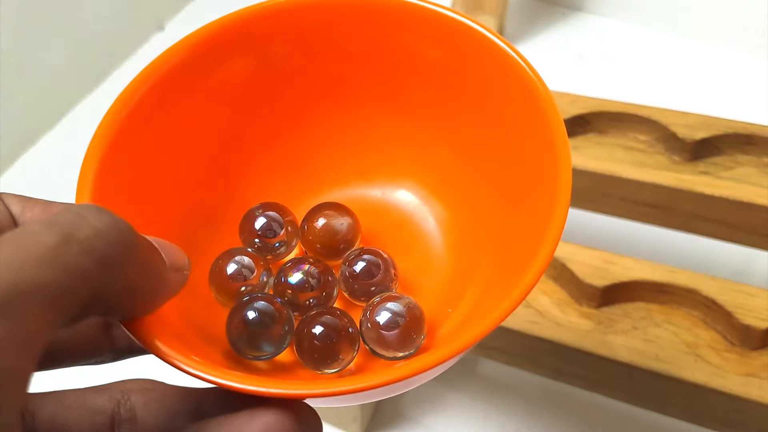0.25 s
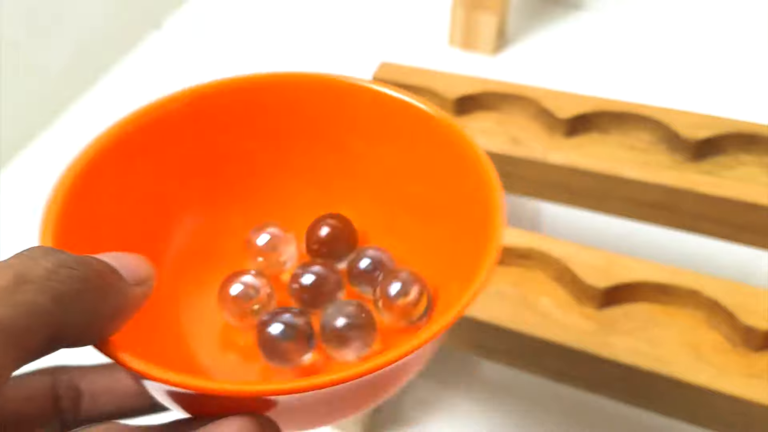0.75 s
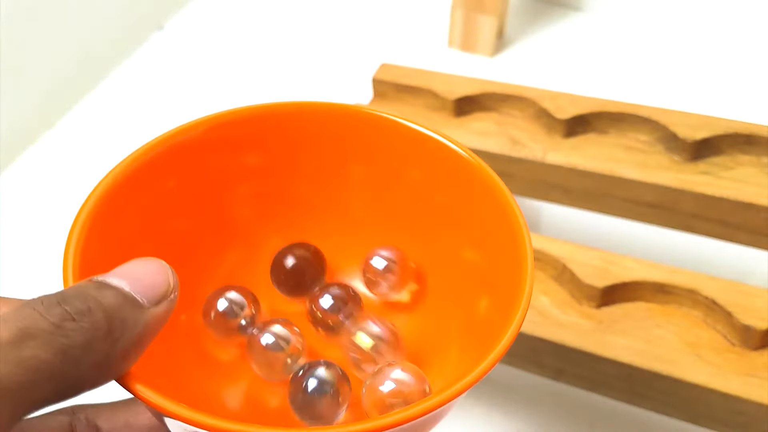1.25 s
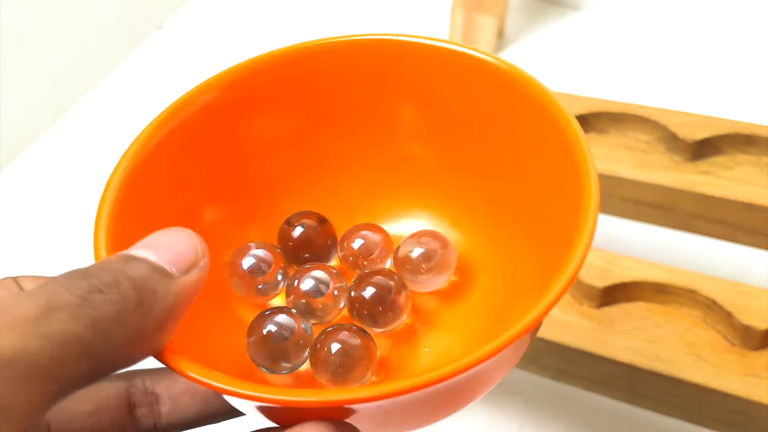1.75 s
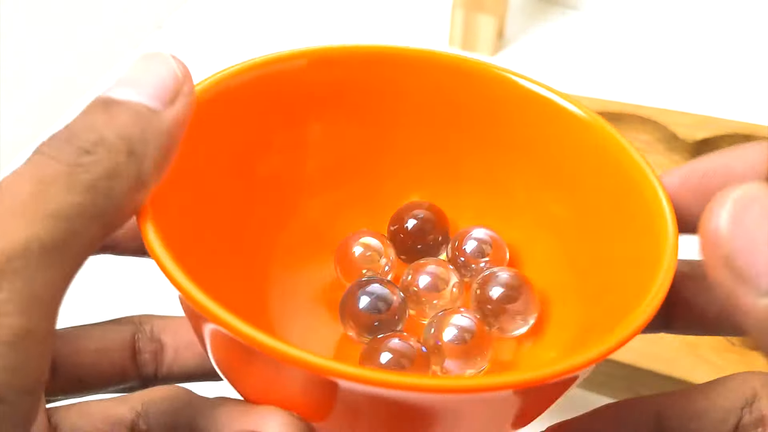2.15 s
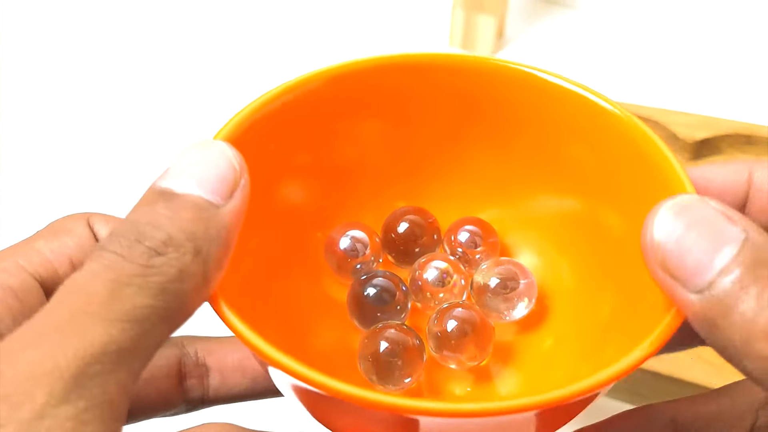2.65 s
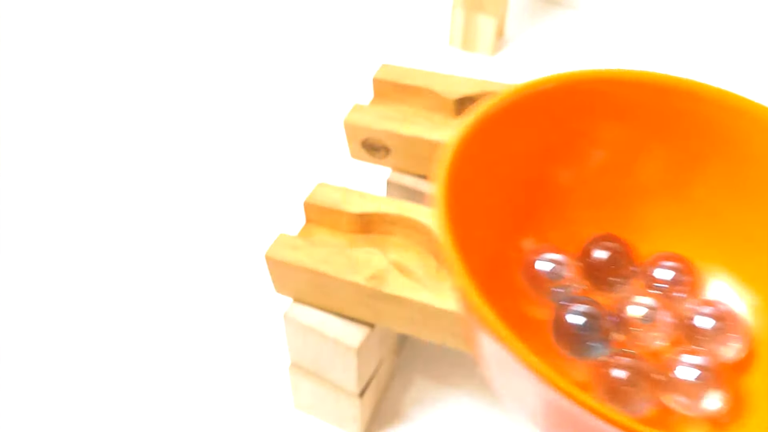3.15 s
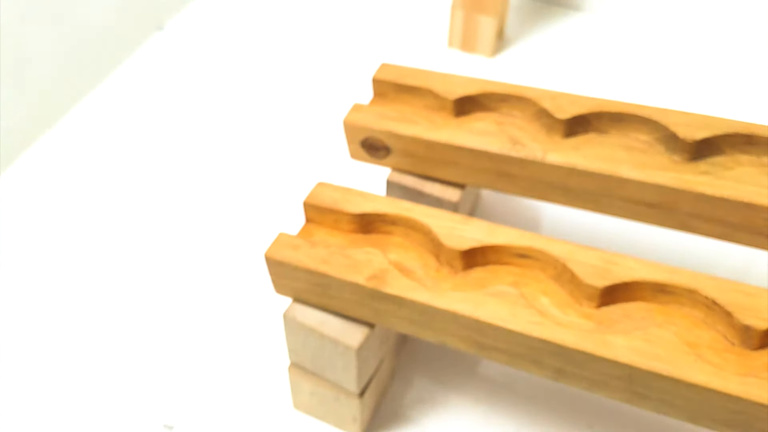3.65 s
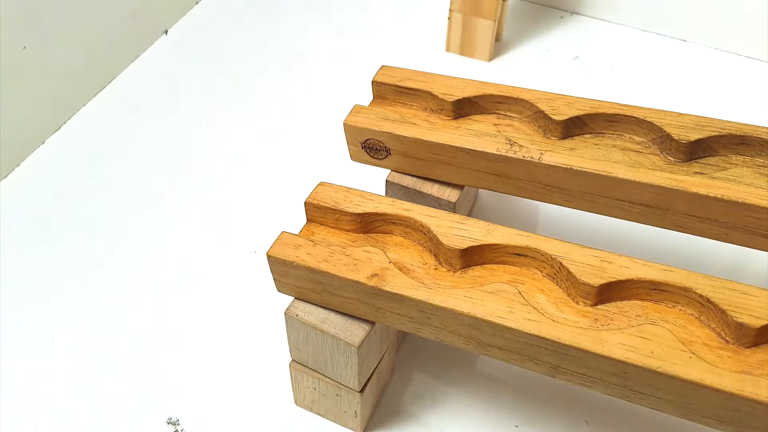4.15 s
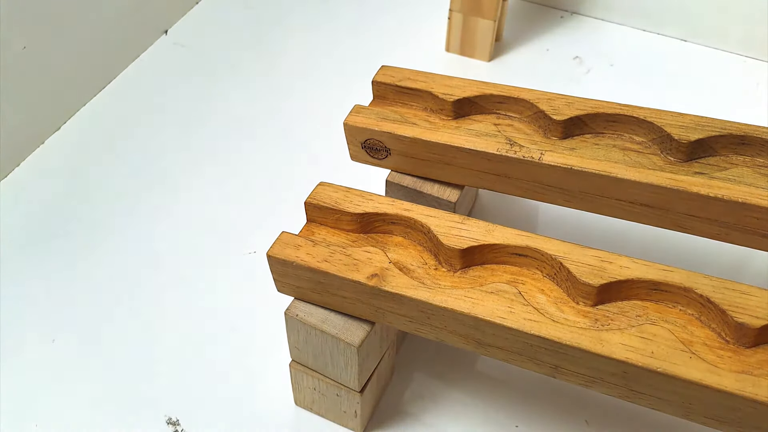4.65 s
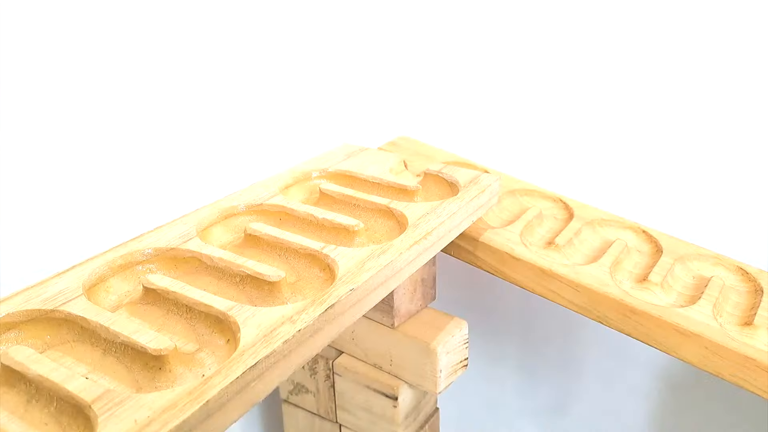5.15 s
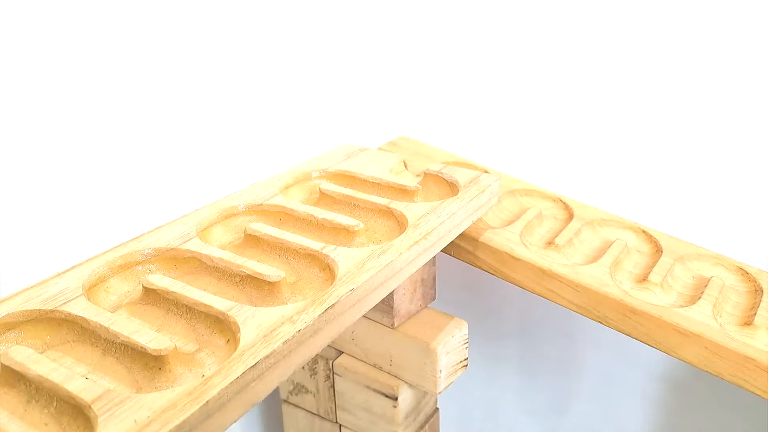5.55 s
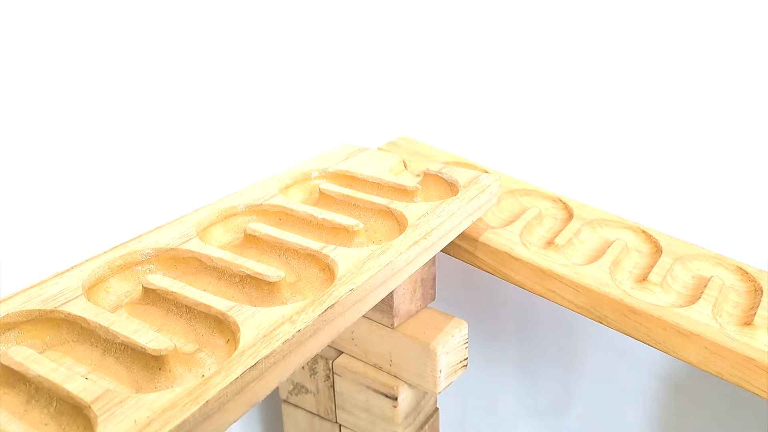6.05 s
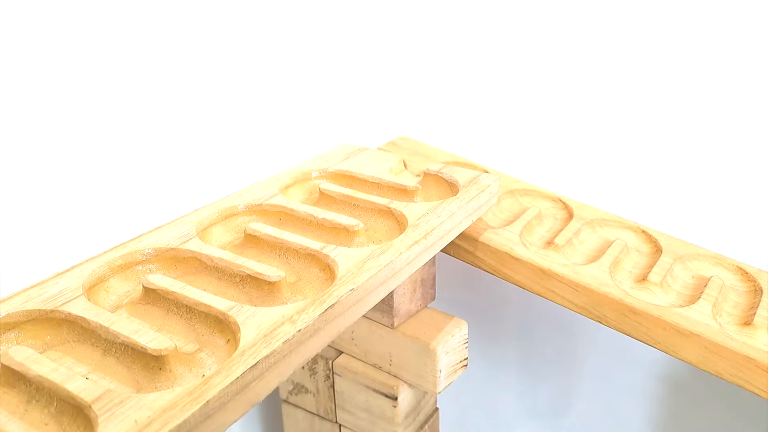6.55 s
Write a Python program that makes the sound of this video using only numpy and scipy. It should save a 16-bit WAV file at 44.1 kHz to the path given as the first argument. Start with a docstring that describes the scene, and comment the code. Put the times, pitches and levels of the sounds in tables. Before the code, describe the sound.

Glass marbles rattle close by in a hand-held plastic bowl, shaken twice so they clink brightly and knock its sides. They settle into light ticks, then the bowl is set down slightly to the right with a hollow boom and another clatter. After a lull, one marble drops onto a wooden track, bounces and starts rolling. The room is small and hard, with faint traffic and later an idling engine outside.

```python
"""Glass marbles rattle in a hand-held plastic bowl in a small hard room, traffic rumbling outside.
Shaken twice, they tick against each other and knock the wall, base and rim into ringing.
The bowl is carried off to the right and set down with a boom. A tick marks the cut to a second scene:
an engine idles beyond the wall, something chirrs far off, and a marble drops onto a wooden track,
bounces and rolls away over the grain."""
import sys
import numpy as np
from scipy import signal
from scipy.fft import rfft, irfft
from scipy.io import wavfile
from scipy.ndimage import uniform_filter1d

SR = 44100
rng = np.random.default_rng(int(sys.argv[2]) if len(sys.argv) > 2 else 0)


def store_wav(level_fs):
    """Save 16-bit WAV to argv[1]."""
    pcm = np.round(np.clip(np.atleast_2d(level_fs), -1, 1) * 32767)
    wavfile.write(sys.argv[1], SR, pcm.T.astype(np.int16))


N = 299880

# jolts that set the marbles jostling: start/s, rise/s, hold/s, wall level/dB, rim re wall/dB,
# glass re wall/dB
JOLTS = [(0, 0.00067, 0.005, -41, -2.5, -1.5), (0.092, 0.0018, 0.0033, -34.5, -11, -1),
         (0.523, 0.053, 0.044, -57.5, -36, -29), (0.608, 0.036, 0.058, -32, -17.5, -9),
         (0.729, 0.0026, 0.065, -29, 6, 8), (0.832, 0.0018, 0.14, -28.5, 8, 7.5),
         (1.155, 0.003, 0.054, -29.5, 8.5, 10.5), (1.227, 0.035, .26, -30.5, 7, 6),
         (1.533, 0.016, 0.046, -42.5, -9, 5), (2.063, 0.0054, 0.07, -55.5, -22, -13),
         (2.212, 0.0021, 0.03, -44, -23.5, -5), (2.46, 0.0016, 0.085, -73.5, -43, -13),
         (2.61, .002, 0.035, -67, -29.5, -9), (3.502, .002, .015, -61, -46.5, -7),
         (3.564, 0.0021, 0.091, -63, -59, -2.5), (3.867, 0.0024, 0.034, -70.5, -26, 6),
         (4.124, .002, 0.045, -53, -39.5, -5), (4.318, 0.0025, 0.092, -44, -16.5, -1),
         (4.409, 0.0015, 0.022, -23.5, -16, -2), (4.589, 0.0028, 0.028, -25.5, -20.5, 9.5),
         (4.643, 0.0055, 0.045, -32.5, -11.5, -3), (4.703, .003, 0.06, -37.5, -31, -2),
         (4.834, 0.014, .01, -43, -30, -15), (4.851, .002, 0.015, -35, -31, -5.5),
         (4.945, 0.0012, 0.0092, -45, -34, -2)]
# single clinks that stand out of the rattle: t/s, glass level/dB, wall re glass/dB
CLINKS = [(0.0186, -41.5, 4), (0.0978, -19, -0.5), (0.669, -9.5, -25), (0.7344, -3, -12.5),
          (0.7695, -14, -37), (0.835, -5, -12), (0.8631, -4, -12), (0.886, -8, -2), (0.9073, -9, -16),
          (0.9235, -21, -28), (1.098, -31.5, -36.5), (1.155, -6, -9), (1.1594, -6, -14), (1.1764, 0, -37),
          (1.1893, -13, -8), (1.2086, -15, -10), (1.264, -15.5, -3), (1.295, -7, -11), (1.3311, -16, -30),
          (1.351, -8.5, -6.5), (1.3874, -16, -17), (1.3972, -11.5, -23), (1.4255, -12.5, -11),
          (1.5915, -23, 1.5), (1.711, -44, -0.5), (1.7232, -42, -16), (1.858, -41.5, -4),
          (1.8916, -63.5, 1), (1.961, -44, -1), (1.988, -62, 4), (2.071, -51, 7.5), (2.1201, -49, 5),
          (2.1486, -36.5, 1), (2.216, -45, -12), (2.2925, -31, 1), (2.465, -55, 8.5), (2.5102, -45, -15),
          (2.6112, -58, 4.5), (2.9573, -46.5, -8), (3.1066, -44.5, -5), (3.232, -43.5, -2),
          (3.508, -32.5, -5), (3.5658, -20, -17.5), (3.5866, -43, 9), (3.7197, -46.5, -23.5),
          (3.8719, -40, 2), (4.0348, -41, -8), (4.1309, -35, -2), (4.1729, -52, -5), (4.234, -42.5, 2.5),
          (4.3265, -24.5, -13), (4.4161, -13, -0.5), (4.594, -19, 8), (4.6051, -2, -16), (4.6546, -9, -6),
          (4.7117, -10, -5.5), (4.8641, -12.5, -23), (4.9539, -22.5, -5)]
# modes of the bowl's three parts and of glass on glass: f/Hz, width/Hz, level/dB
WALL_MODES = [(1170, 150, -17.5), (1216, 250, -1), (1260, 150, 3.5), (1504, 150, 4.5), (1689, 47, -3),
              (1890, 590, -7), (2836, 590, -5.5)]
BASE_MODES = [(94, 30, -13.5), (210, 60, -21), (398, 170, -20), (533, 100, -1.5), (679, 83, 4.5),
              (771.5, 32, 0.5), (824, 170, 6), (5020, 230, -8.5)]
RIM_MODES = [(3864, 120, -2.5), (3973, 79, 2), (4041, 50, 1), (4116, 60, -2), (4460, 80, -9.5)]
GLASS_MODES = [(2840, 170, -10.5), (4570, 370, 1), (5400, 2400, -2), (6600, 170, 2.5), (7040, 150, 4.5),
               (8130, 480, 3.5), (9400, 680, -2.5), (10220, 120, 0), (10965, 450, -3), (12100, 1000, -4.5),
               (12700, 210, -1), (13300, 1800, -11)]
# pan of the marbles, left minus right: t/s, below 2 kHz/dB, above 2 kHz/dB
PAN = [(2.9, 3, 0.5), (3.4, -4.5, -4.5), (5.2, 1, -3.5), (5.21, 0, 0)]
# how late they reach the left microphone: t/s, lag/ms
LEFT_LAG = [(3, -.17), (3.5, .45), (5.2, .45), (5.21, .33)]
# decay of the room: f/Hz, T60/s
ROOM_T60 = [(100, 0.36), (1000, 0.21), (5000, 0.21), (14000, 0.13)]
# traffic swells in the first scene: t/s, rumble level/dB, murmur level/dB
TRAFFIC_SWELLS = [(0, -55, -61), (.6, -48.5, -64.5), (1.2, -61.5, -64.5), (1.8, -67, -81.5),
                  (2.5, -66.5, -76), (3.1, -57, -66), (3.95, -50, -62.5), (4.35, -55.5, -66.5),
                  (4.7, -44, -60), (5.2, -66.5, -70)]
# tone colour of the three traffic layers and the microphone hiss: f/Hz, relative level/dB
RUMBLE_SPECTRUM = [(25, -21), (49, 1.5), (70, -15.5), (97, 9.5), (118, -1.5), (142, 2), (170, -21),
                   (250, -39)]
MURMUR_SPECTRUM = [(120, -35.5), (180, -7), (300, 1), (380, -9), (480, -11.5), (700, -39)]
WASH_SPECTRUM = [(300, -29.5), (500, -1), (750, 0), (1100, -9), (3500, -15.5), (4500, -25.5), (7500, -26),
                 (10500, -33), (12500, -50)]
HISS_SPECTRUM = [(500, -20), (900, 0), (5000, -4), (7500, -8), (10800, -10), (12500, -20), (13200, -70)]
# exhaust harmonics: multiple of the firing rate, relative level/dB
EXHAUST_HARMONICS = [(3, -10), (4, -12), (5, -11), (6, -1), (7, 0), (8, -4), (9, -12), (10, -19), (11, -22)]
# bands of the distant chirr: f/Hz, width/Hz, relative level/dB
CHIRR_BANDS = [(2640, 13, -2), (3190, 84, -4.5), (3412, 41, -1.5), (3720, 450, -11.5), (4240, 59, -5.5),
               (4674, 310, -11.5), (6050, 40, -3.5), (8060, 51, -18.5), (10300, 58, -11)]
# modes of the wooden track: f/Hz, width/Hz, level/dB
TRACK_MODES = [(105.6, 23, -9), (196, 114, -12.5), (348, 8.4, 3), (421, 31, -6.5), (600, 165, -4),
               (988, 39, 1.5), (1286, 140, -0.5), (1547, 124, 0), (1810, 110, 1), (2130, 85, -7.5),
               (2560, 64, -2.5), (3300, 390, -11.5), (4800, 410, -29.5), (7600, 2100, -38)]
# the marble's roll and its bounces on the track: t/s, level/dB, brightness/0-1
ROLL = [(6.479, -27, 0.98), (6.49, -13.5, 1), (6.52, -33.5, 0.2), (6.564, -31, 0.7), (6.6, -43, 0),
        (6.66, -46, 0.1), (6.72, -44.5, 0), (6.8, -38.5, 0)]
BOUNCES = [(6.486, -9, 1), (6.495, -13, 0.78), (6.5, -14.5, 0), (6.519, -20.5, 0.8), (6.536, -7.5, 1),
           (6.543, -11.5, 1), (6.558, -12.5, 0.33), (6.567, -21, 0.9), (6.682, -23, 1), (6.748, -24, 0.3)]

SAG_DB_PER_S, SETTLE_DB_PER_S = 26.5, 327.5  # a jolt sags from its peak and dies fast after its hold
SOFT_BELOW_DB = -16.5  # lighter clinks sound duller
SET_DOWN_S, KNOCK_S, CUT_S = 4.405, 4.594, 5.2105
BASE_HELD_DB, BASE_DOWN_DB, KNOCK_DB, KNOCK_FADE_S = -13, 3.5, 5, 0.017
ROOM_DB, CUT_TICK_DB = -3.5, -37
IDLE_HZ, IDLE_DB = 12, -40.5  # firing rate and level of the engine
CHIRR_REST_DB, CHIRR_SWELL_DB, CHIRR_SWELL_S, CHIRR_SWELL_WIDTH_S = -71, 4.5, 5.88, 0.24


def undb(db):
    """Decibels to gain."""
    return 10 ** (np.asarray(db) / 20)


def curve(table, at, column=1):
    """One column of a breakpoint table, interpolated along the first."""
    rows = np.array(table, float)
    return np.interp(at, rows[:, 0], rows[:, column])


def noise_bed(spectrum, mono_below_hz):
    """Shaped stereo noise of rms 1, narrowing to mono in the bass."""
    hz = np.arange(N // 2 + 1) * SR / N + 1
    gain = undb(curve([(np.log(f), db) for f, db in spectrum], np.log(hz)))
    gain *= np.minimum(spectrum[-1][0] / hz, 1) ** 4
    mid, side = rfft(rng.standard_normal((2, N))) * gain
    side = side * hz / np.hypot(hz, mono_below_hz)
    out = irfft(np.array([mid + side, mid - side]), N)
    return out / out.std()


def wander(rate_hz):
    """Smooth random modulation with a spread of 1."""
    hold = int(SR / rate_hz)
    steps = np.repeat(rng.standard_normal(N // hold + 1), hold)
    smooth = uniform_filter1d(uniform_filter1d(steps, hold), hold)[:N]
    return smooth / smooth.std()


def contacts(start_s, end_s, rate, spread_db):
    """Times and levels of random contacts, many soft and few hard, with a mean power of 0 dB."""
    when, strength = rng.random((int(rate * (end_s - start_s)), 2)).T
    db = -spread_db * np.log(1 - .97 * strength)
    return start_s + when * (end_s - start_s), db - 10 * np.log10(np.mean(undb(db) ** 2))


def ring(modes, hits, swarm, rate, tilt_db_per_octave, drift_db, wide_hz=920):
    """A body rung by hits (t/s, peak/dB) and a swarm (t/s, rms/dB) of `rate` contacts a second."""
    hz, width, db = np.transpose(modes)
    radii = np.exp(-np.pi * width / SR)
    gains = undb(db) * (1 - radii)
    peak = np.sqrt(np.sum(gains ** 2))
    rms = np.sqrt(rate / SR * np.sum(gains ** 2 / (1 - radii ** 2)) / 2)
    times = np.concatenate([hits[0], swarm[0]])
    strength = np.concatenate([undb(hits[1]) / peak, undb(swarm[1]) / rms])
    half_lag = curve(LEFT_LAG, times) * SR / 2000
    start = max(int(times.min() * SR) - 100, 0)
    end = min(int(times.max() * SR) + SR // 4, N)
    out = np.zeros((2, N))
    for f, radius, gain in zip(hz, radii, gains):
        # each blow lands elsewhere, so it finds the mode with another sign and strength
        sign, luck, lobe = rng.standard_normal((len(times), 3)).T
        colour_db = 4 * luck + tilt_db_per_octave * np.log2(f / 1000)
        # the mode also comes and goes over a few blows
        drift = undb(drift_db * np.interp(times * 14, np.arange(100), rng.standard_normal(100)))
        force = drift * gain * strength * np.sign(sign) * undb(colour_db)
        # higher modes radiate in lobes, reaching the two microphones in different phases
        phase = np.exp(1j * lobe * min(f / wide_hz, 1.3))
        pan_db = curve(PAN, times, column=2 if f > 2000 else 1) / 2
        pole = radius * np.exp(2j * np.pi * f / SR)
        for channel, side in enumerate((1, -1)):
            # the lowest modes shake the whole table and reach both microphones at once
            at = np.clip(times * SR + side * half_lag * (f > 500), 0, N - 1).astype(int)
            blows = np.zeros(end - start, complex)
            np.add.at(blows, at - start, force * undb(side * pan_db) * (phase if channel else 1))
            out[channel, start:end] += signal.lfilter([1], [1, -pole], blows).imag
    # a small body radiates little below its first mode; contact is too soft for much above the last
    band = signal.butter(2, [hz.min() * .7, min(hz.max() * 1.4, 19000)], "band", fs=SR, output="sos")
    return signal.sosfilt(band, out)


def jostle(t):
    """Wall, rim and glass envelopes in dB: each jolt rises, sags and settles, and their powers add."""
    start, rise, hold, wall_db, rim_db, glass_db = np.transpose(JOLTS)[:, :, None]
    age = t - start - rise
    db = wall_db + 40 * np.minimum(age / rise, 0)
    db -= SAG_DB_PER_S * np.maximum(age, 0) + SETTLE_DB_PER_S * np.maximum(age - hold, 0)
    return [10 * np.log10(np.sum(undb(db + offset) ** 2, axis=0) + 1e-14)
            for offset in (0, rim_db, glass_db)]


def base_boom(t):
    """Gain of the base in dB: damped by the hand, booming on the table, most at the hard knock."""
    knock_db = KNOCK_DB * np.exp(-np.maximum(t - KNOCK_S, 0) / KNOCK_FADE_S) * (t > KNOCK_S - .002)
    return np.where(t > SET_DOWN_S, BASE_DOWN_DB + knock_db, BASE_HELD_DB)


def bowl_rattle():
    """Marbles knock the wall, base and rim of the bowl and tick against each other."""
    clink_s, clink_db, wall_db = np.transpose(CLINKS)
    # every clink chatters on in three softer rebounds
    rebound_s = np.cumsum(.006 * rng.exponential(size=(len(clink_s), 3)), axis=1)
    hit_s = np.column_stack([clink_s, clink_s[:, None] + rebound_s]).ravel()
    rebound_db = np.column_stack([np.zeros_like(clink_s), -8 - 250 * rebound_s])
    softness = np.clip(SOFT_BELOW_DB - clink_db, 0, 40)
    # the rim's share of a clink follows the jostling around it, and is less for a light one
    _, rim_jostle, glass_jostle = jostle(clink_s + 0.0035)
    rim_db = np.minimum(rim_jostle - glass_jostle, 0) - 0.75 * softness

    def part(modes, peak_db, envelope, rate, spread_db, drift_db, dulling=0, pivot_octaves=0):
        """Clinks and jostling on one part; soft contacts tilt darker about a pivot above 1 kHz."""
        t, contact_db = contacts(0, CUT_S - .1, rate, spread_db)
        swarm_db = envelope(t)
        hit_tilt = -dulling * softness
        swarm_tilt = -dulling * np.clip(SOFT_BELOW_DB - 12 - swarm_db, 0, 30)
        hit_db = (peak_db - pivot_octaves * hit_tilt)[:, None] + rebound_db
        swarm_db = swarm_db + contact_db - pivot_octaves * swarm_tilt
        tilt = np.concatenate([np.repeat(hit_tilt, 4), swarm_tilt])
        return ring(modes, (hit_s, hit_db.ravel()), (t, swarm_db), rate, tilt, drift_db)

    wall = part(WALL_MODES, clink_db + wall_db + 1, lambda t: jostle(t)[0] - 3,
                rate=400, spread_db=3, drift_db=1.5, dulling=0.22, pivot_octaves=.4)
    base = part(BASE_MODES, clink_db + wall_db + base_boom(clink_s) - 2,
                lambda t: jostle(t)[0] + base_boom(t) - 2, rate=300, spread_db=2.5, drift_db=.8)
    rim = part(RIM_MODES, clink_db + rim_db - 2.5, lambda t: jostle(t)[1] - 3,
               rate=250, spread_db=3, drift_db=3.5)
    glass = part(GLASS_MODES, clink_db + 0.5, lambda t: jostle(t)[2] - 2,
                 rate=500, spread_db=4.2, drift_db=2.8, dulling=0.08, pivot_octaves=2.9)
    return wall + base + rim + glass


def room_reverb(sound):
    """Hard walls return a short tail that dies octave by octave, near mono in the bass."""
    t = np.arange(SR // 2) / SR
    tail = 0
    for hz in 125 * 2. ** np.arange(8):
        band = signal.butter(2, [hz / 2 ** .5, min(hz * 2 ** .5, 20000)], "band", fs=SR, output="sos")
        t60 = curve([(np.log(f), decay_s) for f, decay_s in ROOM_T60], np.log(hz))
        mid, side = signal.sosfilt(band, rng.standard_normal((2, len(t)))) * undb(-60 * t / t60)
        tail = tail + mid + min(hz / 730, 1) * side * np.array([[1], [-1]])
    tail *= np.clip((t - .002) / 0.0014, 0, 1)  # pre-delay of the nearest walls
    tail /= np.sqrt(np.mean(np.sum(tail ** 2, axis=1)))
    return undb(ROOM_DB) * signal.fftconvolve(sound, tail, axes=1)[:, :N]


def traffic(t):
    """Rumble, murmur and wash from the street: swelling unevenly, then just wavering after the cut."""
    rumble_db = np.where(t > CUT_S, -48.5, curve(TRAFFIC_SWELLS, t))
    murmur_db = np.where(t > CUT_S, -69, curve(TRAFFIC_SWELLS, t, column=2))
    wash_db = np.where(t > CUT_S, -83, murmur_db + 0.5)
    rumble = noise_bed(RUMBLE_SPECTRUM, mono_below_hz=1500) * undb(rumble_db + 1.5 * wander(6))
    murmur = noise_bed(MURMUR_SPECTRUM, mono_below_hz=790) * undb(murmur_db + 1.1 * wander(5))
    wash = noise_bed(WASH_SPECTRUM, mono_below_hz=800) * undb(wash_db + 1.8 * wander(6))
    return rumble + murmur + wash


def microphone_hiss(t):
    """A faint noise floor that steps up at the cut."""
    return noise_bed(HISS_SPECTRUM, mono_below_hz=300) * undb(np.where(t > CUT_S, -71.5, -80))


def idling_engine(t):
    """Exhaust drone: harmonics of the firing rate, each wavering in level and phase."""
    drone = 0
    for harmonic, db in EXHAUST_HARMONICS:
        level = undb(db + 2.7 * wander(7.7))
        drone = drone + level * np.sin(2 * np.pi * harmonic * IDLE_HZ * t + 1.6 * wander(7.8))
    return drone / drone.std() * undb(IDLE_DB)


def distant_chirr(t):
    """Narrow bands of wide stereo noise that flicker separately and swell once together."""
    f = np.arange(N // 2 + 1) * SR / N
    chirr = 0
    for hz, width, db in CHIRR_BANDS:
        shape = undb(db) / (1 + ((f - hz) / width * 2) ** 2)
        band = irfft(rfft(rng.standard_normal((2, N))) * shape, N)
        chirr = chirr + band * undb(.8 * wander(4))
    swell = np.exp(-((t - CHIRR_SWELL_S) / CHIRR_SWELL_WIDTH_S) ** 4)
    return chirr / chirr.std() * undb(CHIRR_REST_DB + CHIRR_SWELL_DB * swell)


def marble_on_track():
    """A marble bounces, then rolls over the wood grain; harder contact reaches the higher modes."""
    bounce_s, bounce_db, bounce_brightness = np.transpose(BOUNCES)
    grain_s, grain_db = contacts(ROLL[0][0], N / SR - .002, rate=1000, spread_db=1)
    roll_db = grain_db + curve(ROLL, grain_s) - 4
    brightness = np.concatenate([bounce_brightness, curve(ROLL, grain_s, column=2)])
    return ring(TRACK_MODES, (bounce_s, bounce_db + 0.5), (grain_s, roll_db), rate=580,
                tilt_db_per_octave=7.3 * (brightness - 0.85), drift_db=-1, wide_hz=485)


def scene():
    """Marbles up close in the room over a bed of traffic; engine and chirr enter on the cut's tick."""
    t = np.arange(N) / SR
    marbles = bowl_rattle() + marble_on_track()
    mix = marbles + room_reverb(marbles) + traffic(t) + microphone_hiss(t)
    mix += (t > CUT_S) * (idling_engine(t) + distant_chirr(t))
    mix[:, int(CUT_S * SR)] += undb(CUT_TICK_DB)
    return mix


def record(dry):
    """A phone rounds off the loudest peaks and cuts the top end."""
    lowpass = signal.ellip(10, .2, 95, 15900, fs=SR, output="sos")
    return signal.sosfilt(lowpass, .8 * np.tanh(dry / .8))


dry = scene()
out = record(dry)
store_wav(out)
```